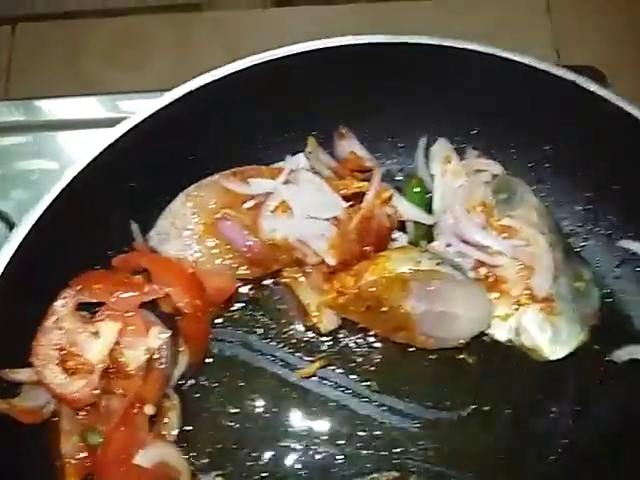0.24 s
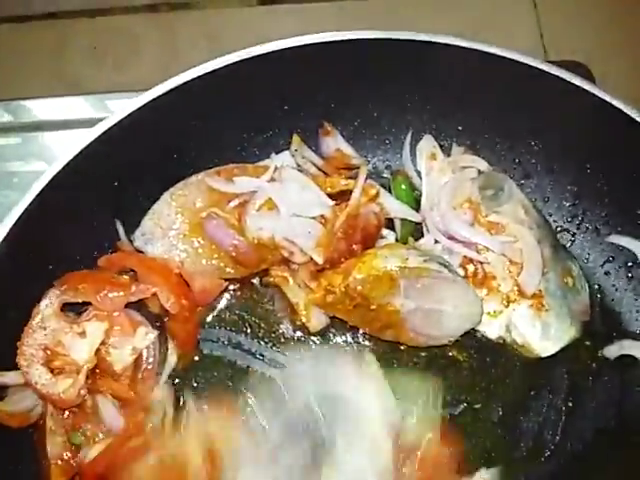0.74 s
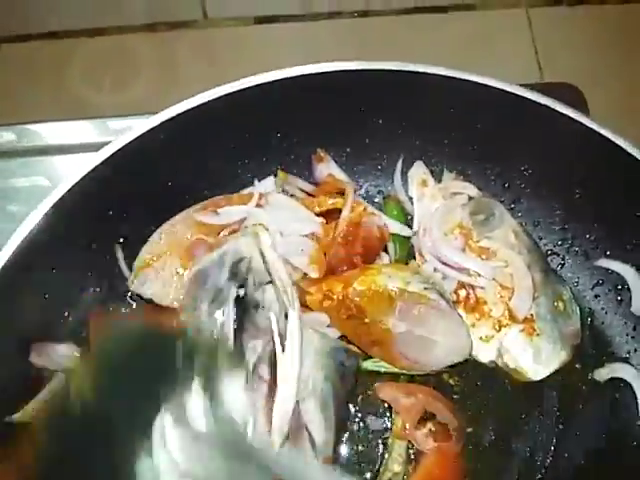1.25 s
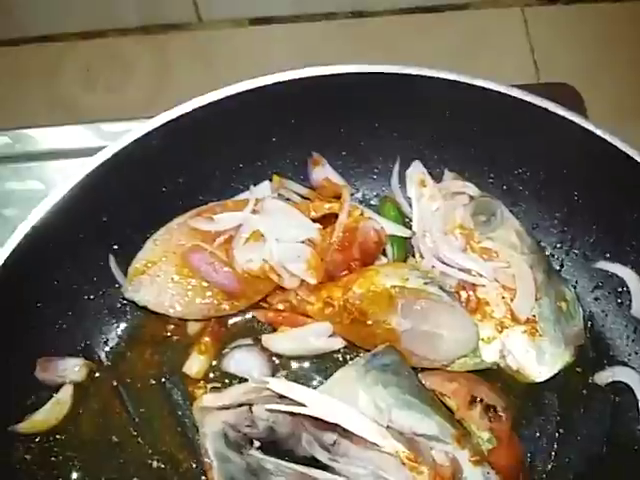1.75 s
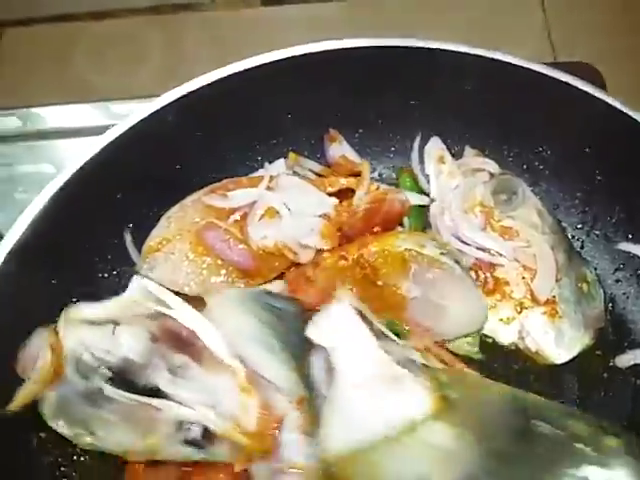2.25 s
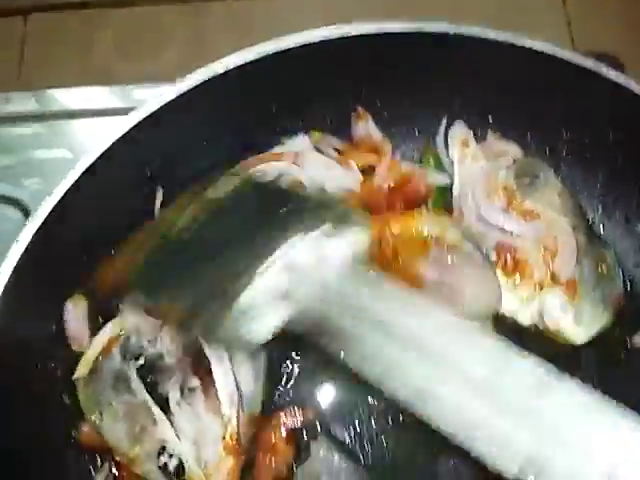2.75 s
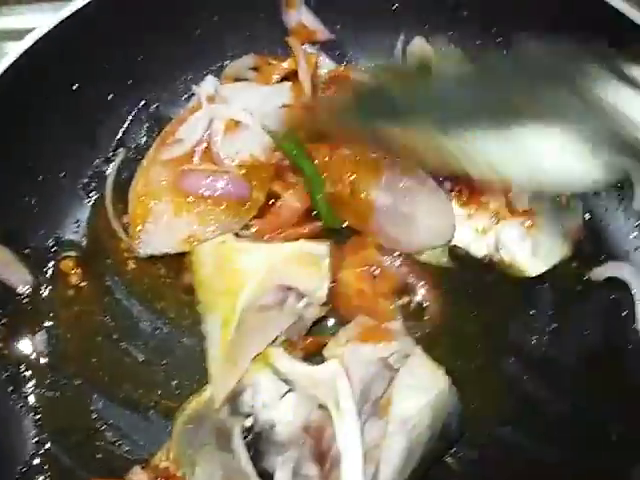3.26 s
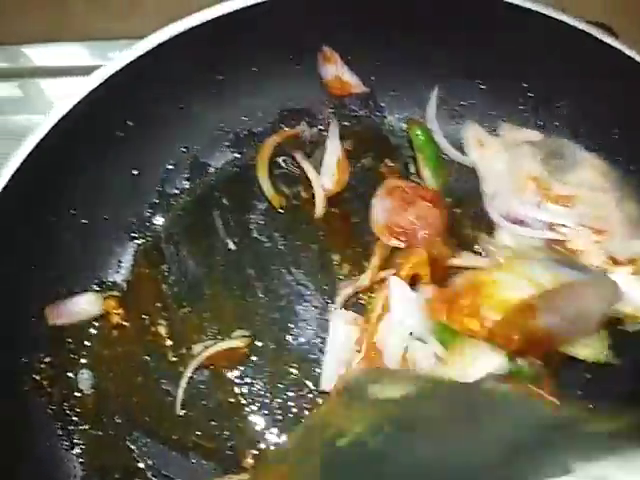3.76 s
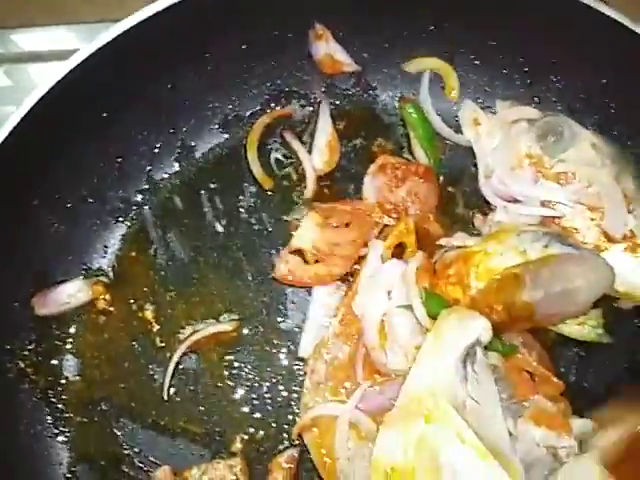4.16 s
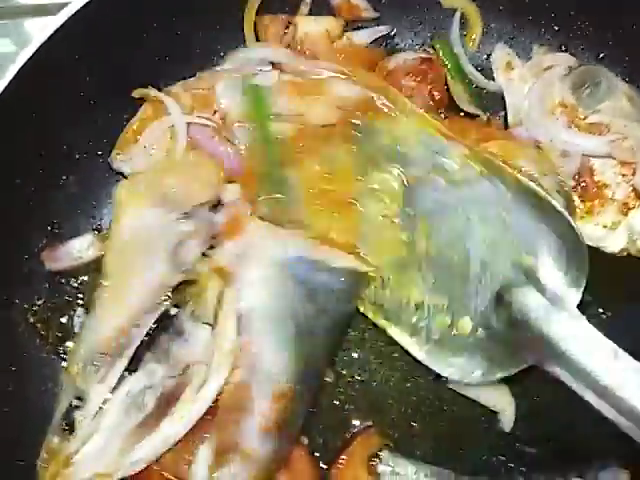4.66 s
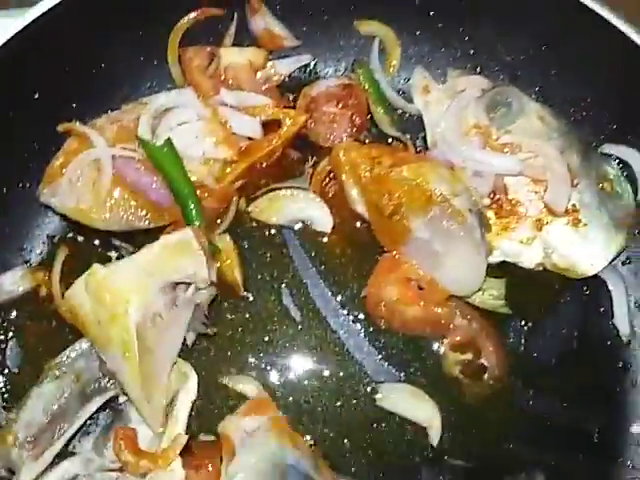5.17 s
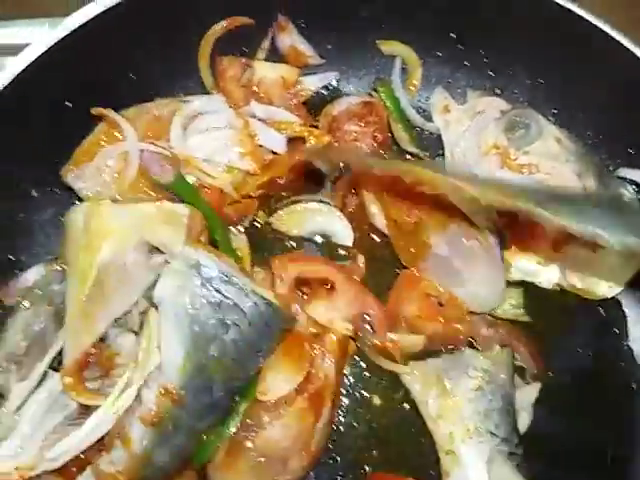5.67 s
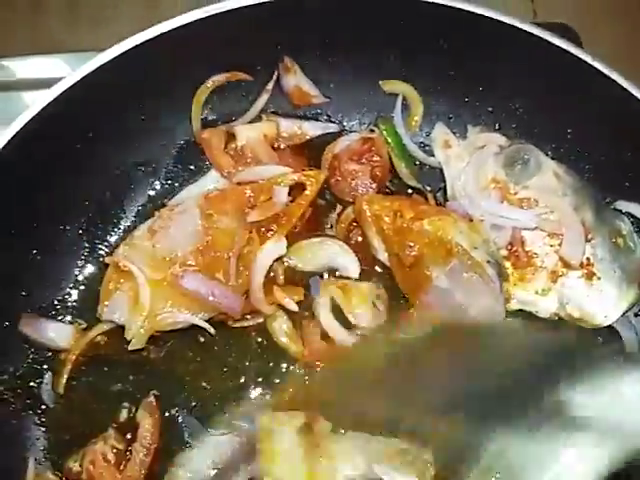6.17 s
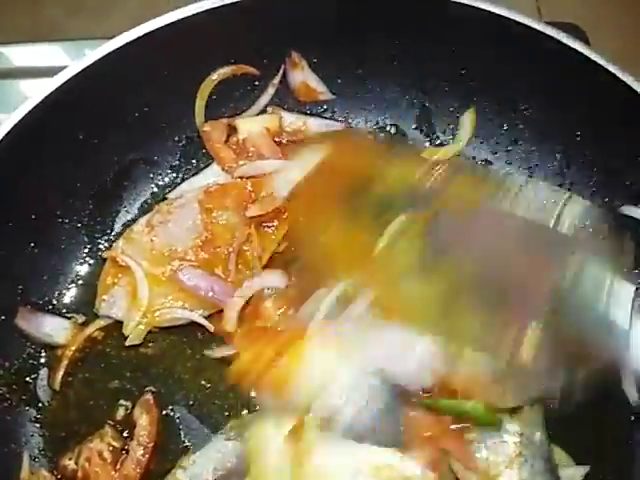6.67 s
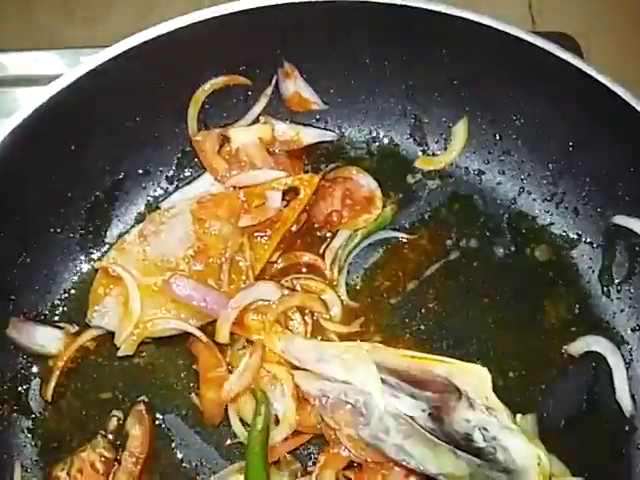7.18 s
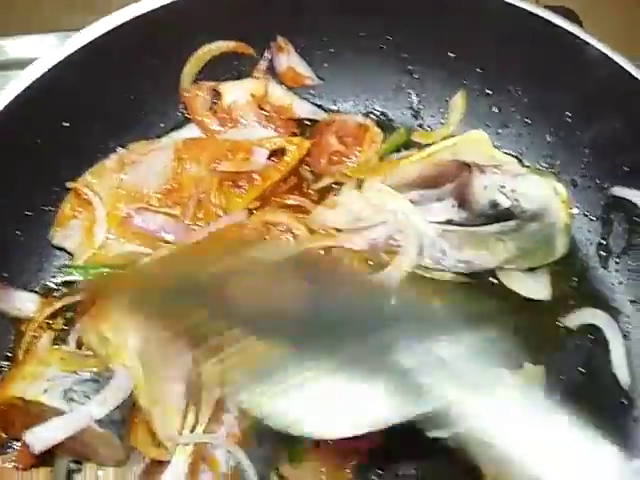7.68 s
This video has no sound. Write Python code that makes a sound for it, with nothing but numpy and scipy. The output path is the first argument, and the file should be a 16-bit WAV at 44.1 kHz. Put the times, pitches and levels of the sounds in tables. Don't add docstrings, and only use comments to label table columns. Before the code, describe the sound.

A steel turner works raw fish in a coated pan, close to a small microphone. Every second or so it strikes the pan with a hard clank, then drags in a short gritty scrape that makes the bowl and blade ring briefly. Between strokes come faint rubbing through food and tiny wet ticks. Hard kitchen walls add a short echo over a low, gently wavering hum.

```python
import sys
import numpy as np
from scipy import signal
from scipy.fft import rfft, irfft, next_fast_len
from scipy.io import wavfile

SR = 44100
rng = np.random.default_rng(int(sys.argv[2]) if len(sys.argv) > 2 else 0)


def ratio_of_db(decibels):
    return 10 ** (np.asarray(decibels, float) / 20)


def master_out(mix):
    frames = np.transpose(np.atleast_2d(mix))
    ceiling = np.clip(frames, -1, 1)
    pcm = np.round(ceiling * 32767).astype(np.int16)
    wavfile.write(sys.argv[1], SR, pcm)


N = 349272

# f/Hz, level/dB [per Hz]
ROOM_SPECTRUM = [(15, -56), (25, -24.5), (92, 2.5), (157, -11), (217, -9.5), (242, -20), (326, -6),
                 (394, -16), (451, -3.5), (591, -14), (1330, -20), (2280, -32), (2840, -7), (3340, -40.5),
                 (16000, -48.5)]
# f/Hz, width/Hz, level/dB
HUMS = [(100.6, 7.6, -59), (148.2, 21, -60), (337.5, 25, -63.5), (459.7, 34, -66), (6100, 1070, -93)]
# t/s, level/dB
RUMBLE_SWELL = [(0.0, -58), (0.84, -51), (1.1, -58.5), (1.68, -54), (1.94, -53), (3.09, -57.5), (3.7, -49),
                (3.97, -57), (4.24, -52), (6.0, -58), (6.6, -52), (6.97, -60), (7.92, -52.5)]
# start t/s, end t/s, f/Hz, level/dB
WHISTLES = [
    (2.45, 3.0, 2810, -78),
    (4.8, 5.05, 3000, -72),
    (4.75, 5.4, 3340, -72),
]
# t/s, peak level/dB, pitch
# f/Hz
WET_TICKS = [(0.0557, -43, 6600), (0.099, -49, 4160), (0.1336, -41, 5800), (0.928, -39, 5830),
             (1.3488, -57, 6700), (1.794, -57, 6770), (2.3391, -47, 5090), (2.4394, -43, 4200),
             (2.489, -52, 7500), (2.545, -50, 9000), (2.472, -42, 6050), (2.5441, -50, 2180),
             (2.974, -41, 5250), (2.916, -55, 3500), (3.167, -55, 5800), (3.172, -54, 7500),
             (3.186, -49, 2500), (3.197, -54, 6300), (3.279, -60, 4000), (3.6294, -42, 10000),
             (3.7805, -39, 3000), (3.9107, -58, 11000), (7.3665, -27, 3300), (7.519, -46, 8000),
             (3.9898, -56, 6430), (4.253, -25, 3860), (4.585, -33, 4790), (4.73, -43.5, 6170),
             (4.9364, -57, 6960), (5.007, -47, 5000), (5.0191, -48, 5000), (5.066, -61, 4500),
             (5.0774, -45, 3390), (5.0937, -42, 2780), (5.1123, -55.5, 2800), (5.149, -67, 6500),
             (5.2465, -62.5, 4040), (4.302, -30, 5500), (1.311, -60, 4800), (1.369, -52, 3400),
             (1.4211, -57, 4960), (1.6505, -55, 6500), (1.6705, -53, 2840), (6.845, -48, 3800),
             (4.3229, -30, 2610), (5.889, -62, 6550), (6.152, -56, 10500), (6.1749, -36, 6600),
             (6.2277, -40, 5900), (6.799, -43, 6940), (6.8317, -42, 6900), (6.891, -41.5, 6270),
             (7.588, -42, 7800), (7.7097, -43, 6700), (7.8456, -51.5, 7000)]
# start t/s, length t/s, peak level/dB [rms], f/Hz
HELD_MODES = [(.72, 0.15, -40.5, 148.4), (0.718, 0.094, -40, 634), (0.788, 0.076, -38, 431.6),
              (0.794, 0.079, -40, 2265), (0.799, 0.079, -40.5, 3980), (0.788, 0.078, -47, 6000),
              (0.794, 0.085, -43.5, 6890), (0.805, .09, -53, 9580), (0.796, 0.074, -53, 10500),
              (1.427, 0.073, -58, 3930), (1.435, 0.12, -57, 2415), (1.459, 0.11, -55, 2840),
              (1.439, 0.053, -57, 1590), (1.516, 0.064, -53, 1620), (2.082, 0.086, -47, 4400),
              (2.151, 0.057, -40.5, 2820), (3.533, 0.13, -34, 512), (3.534, 0.081, -49, 1554),
              (3.55, 0.082, -61, 5190), (3.7, 0.029, -38.5, 3110), (3.701, .05, -43, 2156),
              (3.531, 0.12, -38.5, 268), (3.771, .05, -45, 2170), (4.169, 0.15, -35.5, 424),
              (4.171, 0.1, -41, 302.5), (4.2, 0.13, -42.5, 2582), (4.199, .11, -40.5, 3880),
              (4.235, 0.078, -45, 6060), (4.24, 0.076, -44, 6980), (4.359, 0.056, -37, 1648),
              (4.36, 0.082, -41, 2683), (4.373, 0.085, -46, 3750), (4.502, 0.031, -54, 3770),
              (4.55, 0.1, -55, 2110), (0.718, 0.1, -41.5, 247), (5.422, 0.18, -50, 1640),
              (5.523, 0.054, -42, 2450), (5.531, 0.045, -33, 618), (6.17, .06, -58, 3710),
              (6.285, 0.05, -57, 1100), (6.483, 0.12, -32.5, 441), (6.513, 0.2, -41.5, 2950),
              (6.538, 0.17, -42.5, 3905), (6.603, 0.073, -64, 6800), (6.595, 0.084, -52, 7900),
              (7.372, 0.11, -34, 402), (7.432, 0.064, -36.5, 589), (7.455, 0.025, -32, 1071),
              (7.481, 0.037, -44, 1655), (7.42, 0.03, -18.5, 1070)]
# t/s,
# peak level/dB, f/Hz, T60 t/s
CAUGHT_MODES = [(.723, -28, 342, 0.16), (1.907, -27.5, 296, 0.22), (1.907, -34, 700, 0.3),
                (2.075, -19.5, 419, 0.26), (4.146, -15, 293.6, 0.16), (4.329, -21.5, 342, 0.08),
                (6.475, -17.5, 445, 0.076), (6.489, -13.5, 422, 0.098), (.723, -23, 292, 0.11),
                (7.368, -24.5, 420, 0.35), (.233, -46, 1160, 0.047), (.724, -24.5, 1041, 0.12),
                (.8485, -26, 1074, 0.14), (.855, -23.5, 1267, 0.15), (1.9076, -24.5, 1020, 0.17),
                (2.124, -17, 1136, 0.081), (2.15, -18, 1157, 0.19), (2.192, -14, 1122, 0.17),
                (2.235, -29, 1120, 0.33), (3.064, -37, 1123, 0.29), (4.144, -20, 1010, 0.12),
                (4.364, -21, 1095, 0.12), (4.395, -26, 1155, 0.24), (4.412, -21, 1126, 0.15),
                (4.45, -38, 1116, 0.3), (5.59, -23.5, 1054, 0.15), (6.651, -24, 1080, 0.12),
                (7.404, -22.5, 1058, 0.31), (7.484, -40, 1071, 0.43),
                (0.84, -17.5, 1660, 0.076), (1.55, -47, 1500, 0.23), (1.906, -27.5, 1545, 0.14),
               (1.906, -29.5, 1906, .085), (2.3763, -39, 1675, 0.062), (4.353, -30, 1800, 0.18),
               (5.54, -23, 1660, 0.18), (5.57, -30, 1745, 0.13), (6.55, -32.5, 1650, 0.21),
               (6.665, -25, 1604, 0.1), (6.62, -35, 2290, 0.14), (6.64, -33, 2050, 0.12),
               (7.366, -17, 1750, 0.095), (7.434, -16, 1670, 0.13), (7.475, -32, 1653, 0.3),
               (.8275, -31, 2280, 0.27), (1.906, -34, 2562, 0.085), (3.78, -27, 2110, 0.054),
               (1.906, -38, 3200, .07), (5.421, -40, 3320, 0.054), (5.421, -46, 2600, 0.052),
               (4.145, -29.5, 2800, .12), (3.85, -43, 2350, 0.098), (4.35, -24.5, 3060, .065),
               (4.6, -57, 2200, 0.24), (6.476, -16.5, 2296, 0.056), (0.83, -22.5, 3990, 0.036),
               (3.0636, -32, 3940, 0.05), (6.601, -35, 3880, 0.1), (3.699, -25, 7060, 0.045),
               (3.71, -23.5, 7000, 0.06), (1.3492, -65, 8600, .06), (1.349, -69, 7900, .08),
               (1.349, -65, 6600, .07), (4.352, -30, 6450, 0.06)]
# t/s, peak level/dB, pitch f/Hz
HARD_CONTACTS = [(0.7236, -12, 785), (1.9057, -25, 1020), (2.0745, -23, 700), (2.15, -14, 1160),
                 (2.3755, -32, 1500), (3.067, -28.5, 1120), (3.538, -24, 820), (3.622, -27.5, 700),
                 (4.144, -19, 1000), (4.327, -22, 800), (4.3538, -9.5, 1600), (5.421, -25.5, 890),
                 (5.5885, -13, 1600), (6.475, -15.5, 1320), (6.4902, -15.5, 500), (7.3664, -14.5, 1520)]
# t/s, level/dB, place [0 pan floor - 1 pan wall], hardness level/dB
KNOCKS = [(.723, -18, 0.52, 0), (1.904, -33, 0.78, 10), (1.981, -44.5, 0.98, 7), (2.074, -24.5, 0.62, 3),
          (2.152, -32.5, 0.28, 4), (2.19, -45, 0.82, -6), (2.375, -31, 0.61, -31), (3.022, -39.5, 0.66, -2),
          (3.067, -36.5, 0.48, 8), (3.537, -38.5, 0.2, -3), (3.705, -36.5, 0.5, 10.5),
          (3.775, -44.5, 0.65, 13), (4.144, -26.5, 0.28, 7.5), (4.329, -30, 0.36, -9),
          (4.353, -20, 0.49, 6.5), (5.421, -31, 0.25, -8), (5.588, -30, 0.86, 3.5), (6.474, -23.5, 0.6, 1),
          (6.488, -24.5, 0.53, -20.5), (7.366, -15.5, 0.65, -19)]
# start t/s, swell t/s, fade t/s, peak level/dB
LEANS = [(.724, 0.0052, 0.07, -30), (.77, 0.05, 0.07, -29.5), (1.906, 0.0062, 0.01, -26.5),
         (1.95, 0.12, 0.071, -35.5), (2.072, 0.0013, 0.049, -21.5), (2.12, 0.078, 0.026, -31),
         (3.537, 0.0063, 0.091, -35.5), (3.55, 0.064, 0.068, -34), (4.145, 0.0037, 0.021, -14.5),
         (4.15, 0.061, 0.15, -29.5), (4.29, 0.02, 0.02, -26), (4.322, .008, .012, -20),
         (4.353, .004, 0.044, -27.5), (5.421, 0.0011, 0.026, -27.5), (5.44, 0.098, 0.083, -26.5),
         (6.474, 0.0032, 0.017, -15), (6.49, 0.075, 0.14, -33.5), (7.365, 0.011, 0.034, -26.5),
         (7.38, 0.054, 0.016, -24.5)]
# start t/s, swell t/s, fade t/s, peak level/dB, brightness level/dB [blade over wall]
SCRAPES = [(.724, 0.0011, 0.039, -39.5, 4.5), (0.753, 0.11, 0.023, -24.5, -6.5),
           (0.8, 0.021, 0.078, -32, -1.5), (1.905, 0.0033, 0.072, -34, -5),
           (1.954, 0.047, 0.26, -36.5, -10.5), (2.074, 0.0063, 0.067, -22, -7),
           (2.08, 0.1, 0.056, -20.5, -12.5), (3.04, 0.028, 0.027, -33.5, -6.5),
           (3.538, 0.0043, 0.021, -39, -8), (3.542, 0.074, 0.14, -40, -5.5),
           (3.694, 0.013, 0.044, -26, -4.5), (3.72, 0.055, 0.077, -40.5, -6),
           (4.142, 0.0031, 0.054, -30, -2.5), (4.191, 0.068, 0.069, -32.5, 0.5),
           (4.321, 0.0021, 0.025, -29, -1.5), (4.35, 0.0033, 0.11, -28, 0.5),
           (4.369, 0.061, 0.017, -21.5, -10.5), (5.419, 0.0019, 0.023, -32, -14),
           (5.454, 0.11, 0.06, -27, -12.5), (6.474, 0.0014, 0.14, -28.5, -6),
           (6.538, 0.11, 0.045, -25.5, -5.5), (7.367, 0.0049, 0.056, -21.5, -19),
           (7.379, 0.061, 0.024, -16.5, -17.5), (7.439, 0.027, .016, -21.5, -15)]
# start t/s, swell t/s, fade t/s, peak level/dB, brightness level/dB
DRAGS = [(0.0, 0.00033, 0.18, -47, -2.5), (.222, 0.015, 0.044, -59, -2), (.885, .003, 0.17, -46.5, -3),
         (1.3, 0.015, 0.28, -61, -12), (1.41, 0.12, 0.14, -48, -2), (2.225, .003, 0.45, -49, -9.5),
         (2.3, 0.038, 0.26, -53.5, -1), (2.47, 0.067, 0.035, -57.5, 3.5), (2.88, .15, .05, -51.5, -2),
         (3.09, 0.0058, 0.17, -52.5, -1.5), (3.775, 0.071, 0.097, -46, -6), (3.975, 0.019, .03, -56, -9.5),
         (4.45, 0.078, 0.11, -46.5, -4.5), (4.52, 0.052, 0.3, -48, -3), (4.93, 0.088, 0.2, -55, -6),
         (5.63, 0.0096, 0.09, -47.5, -7.5), (6.0, 0.059, .08, -55, -13.5), (6.09, .14, 0.1, -44, -6),
         (6.69, 0.0033, 0.22, -49, -2.5), (6.74, 0.048, 0.2, -52.5, -1), (6.88, 0.095, 0.044, -67, 4.5),
         (7.49, 0.0028, 0.19, -47, -5), (7.69, 0.01, 0.094, -53, -8.5), (7.82, 0.033, 0.043, -56.5, -15)]
# start t/s, swell t/s, fade t/s, peak level/dB
SKATES = [
    (3.537, 0.087, 0.037, -54),
    (5.51, .04, .018, -49),
    (5.587, .002, .012, -51),
    (6.17, 0.0043, 0.01, -57),
    (6.475, .13, .07, -50),
    (6.85, 0.084, .08, -65),
    (7.37, .07, 0.049, -52),
]
# f/Hz, width/Hz, level/dB [blade on the floor], level/dB [on the wall]
BOWL_MODES = [(267.8, 11, -11, -16), (296, 20.7, -3, 1), (320, 15.3, 4, -3), (437.2, 17, 1, -11),
              (536.7, 16, -11.5, -3), (601.4, 33, -3.5, 3), (731, 9.8, -21.5, -11)]
# f/Hz, width/Hz, level/dB [blade on the floor], level/dB [on the wall]
WALL_MODES = [(1020, 165, -1.5, -7), (1100, 38, 0.5, -7.5), (1230, 91, -12, -9.5), (1602, 75, -2, -8),
              (1690, 18, -5.5, -10.5), (1860, 255, -4.5, -4.5), (2133, 57, -11, -6),
              (2260, 83, -11.5, -5.5), (2683, 330, -18, -4.5)]
# f/Hz, width/Hz, level/dB [blade on the floor], level/dB [on the wall]
BLADE_MODES = [(2915, 610, -2, -2.5), (3480, 83, -12.5, -3), (3745, 420, -10, -4), (4415, 260, -5.5, -3),
               (4960, 300, -6, -5.5), (5440, 280, -4.5, -9.5), (6020, 190, 0, -5.5), (6455, 70, -9, -5.5),
               (6795, 97, -9.5, -5), (7700, 40, -22, -28)]
# f/Hz, width/Hz, level/dB [blade on the floor], level/dB [on the wall]
EDGE_MODES = [(9230, 76, -6.5, -1.5), (10500, 120, -33, -28), (12650, 120, -13.5, -3.5),
              (13500, 190, -27, -19)]
PART_EDGES_HZ = [140, 800, 2800, 8000, 15000]
# its resonances, level/dB of the dense unresolved modes between them
PARTS = [(BOWL_MODES, -4), (WALL_MODES, -19), (BLADE_MODES, -5.5), (EDGE_MODES, 0.5)]

ROOM_TONE_DB = -51
KITCHEN_T60_S, KITCHEN_DB, WALL_CUT_HZ = 0.52, -15, 2600
HELD_WIDTH_HZ, HELD_WIDTH_SHARE = 16, .024
HELD_FLUTTER_DB = 2.5
CRACK_CYCLES = 0.42
PRESS_SWELL_DB, PRESS_FADE_DB = 16, 17.5
DRAG_SWELL_DB, DRAG_FADE_DB = 14, 18.5
EDGE_DB, EDGE_FOLLOWS = -8.5, 1.66
DULLS = 0.086
PLACE_MID, PLACE_SPAN_DB = 0.31, 37
KNOCK_SPAN_DB = 29.5
BLADE_TOP_HZ, EDGE_TOP_HZ = 7900, 12500


def rms_one(x):
    return x / np.sqrt(np.mean(x ** 2) + 1e-20)


def band(x, low_hz, high_hz):
    sos = signal.butter(2, [low_hz, min(high_hz, .45 * SR)], "band", fs=SR, output="sos")
    return signal.sosfilt(sos, x)


def low_pass(x, order, top_hz):
    return signal.sosfilt(signal.butter(order, top_hz, fs=SR, output="sos"), x)


def resonate(x, hz, width_hz):
    r = np.exp(-np.pi * width_hz / SR)
    gain = np.sqrt((1 - r * r) / 2)
    return signal.lfilter(gain * np.array([1, 0, -1]), [1, -2 * r * np.cos(2 * np.pi * hz / SR), r * r], x + 1e-18)


def drift(rate_hz):
    r = np.exp(-80 * np.pi * rate_hz / SR)
    noise = rng.standard_normal(N // 40 + 1002)
    slow = signal.lfilter([1], [1, -2 * r, r * r], noise)[1000:]
    return np.interp(np.arange(N) / 40, np.arange(len(slow)), rms_one(slow))


def room_tone():
    t = np.arange(N) / SR
    swell_s, swell_db = np.transpose(RUMBLE_SWELL)
    swell = ratio_of_db(np.interp(t, swell_s, swell_db, left=swell_db[-1], right=swell_db[-1]) - np.mean(swell_db))
    edges_hz = 22 * 2 ** np.arange(0, 9.6, .5)
    white = rng.standard_normal((2, N))
    hz, db = np.transpose(ROOM_SPECTRUM)
    air = 0
    for k, (low, high) in enumerate(zip(edges_hz, edges_hz[1:])):
        gain = ratio_of_db(np.interp(np.log(low * high) / 2, np.log(hz), db) + 1.2 * drift(2.5))
        air = air + gain * band(white[k % 2], low, high) * (swell if high < 260 else 1)
    out = ratio_of_db(ROOM_TONE_DB - 3.5) * rms_one(air)
    for hz, width_hz, db in HUMS:
        hum = resonate(resonate(rng.standard_normal(N), hz, width_hz), hz, width_hz)
        out += ratio_of_db(db) * swell * rms_one(hum)
    for start_s, end_s, hz, db in WHISTLES:
        fade = np.sin(np.pi * np.clip((t - start_s) / (end_s - start_s), 0, 1)) ** .4
        tone = np.sin(2 * np.pi * hz * t + 0.96 * drift(6.5))
        out += ratio_of_db(db) * fade * ratio_of_db(2 * drift(3.6)) * tone
    return out


def kitchen(x):
    size = next_fast_len(N + SR)
    hz = np.arange(size // 2 + 1) * SR / size
    echo = 0
    for k, lag_s in enumerate(rng.uniform(.012, .04, 12)):
        loss = ratio_of_db(-60 * lag_s / KITCHEN_T60_S * (1.5 + hz / WALL_CUT_HZ))
        loop = loss * np.exp(-2j * np.pi * hz * lag_s)
        echo = echo + (-1) ** k * loop / (1 - loop)
    return irfft(rfft(x, size) * echo, size)[:N]


def wet_ticks():
    out, t = np.zeros(N), np.arange(400) / SR
    for (s, db, hz), noise in zip(WET_TICKS, rng.standard_normal((len(WET_TICKS), 400))):
        snap = noise * np.exp(-t / 0.0019)
        burst = resonate(resonate(snap, hz, 0.38 * hz), hz, 0.46 * hz)
        at = round(s * SR)
        out[at:at + 400] += ratio_of_db(db) * burst / np.abs(burst).max()
    return out


def held_modes():
    out, flutter = np.zeros(N + SR), ratio_of_db(HELD_FLUTTER_DB * drift(45))
    for (s, length_s, db, hz), steps in zip(HELD_MODES, rng.standard_normal((len(HELD_MODES), SR // 2))):
        t = np.arange(round(length_s * SR)) / SR
        width_hz = HELD_WIDTH_HZ + HELD_WIDTH_SHARE * hz
        stagger = np.cumsum(steps[:len(t)]) * np.sqrt(2 * np.pi * width_hz / SR)
        tone = band(np.sin(2 * np.pi * hz * t + stagger), hz / 1.15, hz * 1.15)
        shape = np.sin(np.pi * t / length_s) ** 0.77
        at = round(s * SR)
        out[at:at + len(t)] += ratio_of_db(db + 3) * shape * tone
    return out[:N] * flutter


def singing_modes():
    out, t = np.zeros(N + SR // 2), np.arange(SR // 2) / SR
    sings = CAUGHT_MODES
    for (s, db, hz, t60_s), phase in zip(sings, rng.uniform(0, 2 * np.pi, (len(sings), 2))):
        later_s = [row[0] - s for row in sings if row[0] > s and abs(row[2] / hz - 1) < .07]
        stop_s = min(later_s + [1])
        decays = t / max(t60_s, .02)
        ring = ratio_of_db(db - 60 * decays) + ratio_of_db(db - 36.0 - 25 * decays)
        pumped = (1 - np.exp(-t / 0.0022)) * ring
        pair = np.sin(2 * np.pi * hz * t + phase[0]) + 0.31 * np.sin(2 * np.pi * 1.022 * hz * t + phase[1])
        at = round(s * SR)
        out[at:at + len(t)] += pumped * pair * np.exp(-np.maximum(t - stop_s, 0) / .003)
    return out[:N] * ratio_of_db(1.42 * drift(39))


def cracks():
    out, t = np.zeros(N), np.arange(500) / SR
    for s, db, hz in HARD_CONTACTS:
        pulse = -t * np.exp(-t * hz / CRACK_CYCLES) * np.sin(2 * np.pi * hz * t)
        at = round(s * SR)
        out[at:at + 500] += ratio_of_db(db) * pulse / np.abs(pulse).max()
    return out


def knock_levels_db():
    s, db, place, hard_db = np.transpose(KNOCKS)
    tilt_db = KNOCK_SPAN_DB * (place - .5)
    return [db - tilt_db, db + tilt_db, db + hard_db, db + EDGE_FOLLOWS * hard_db]


def knock_force(levels_db, modes):
    force = np.zeros((modes, N))
    chance = rng.standard_normal((len(KNOCKS), modes + 3))
    for row, db, luck in zip(KNOCKS, levels_db, chance):
        for bounce, loss_db in enumerate([0, -5, -9]):
            delay_s = .0008 + bounce * .0022 * (1 + .25 * luck[bounce])
            at = round((row[0] + delay_s) * SR)
            force[:, at] += ratio_of_db(db + loss_db + 2.04 * luck[3:]) * (-1) ** bounce
    return force


def friction(slips_per_s, spread_db, judder_db):
    sizes = ratio_of_db(spread_db * np.minimum(rng.exponential(1, N), 5)) * rng.choice([-1, 1], N)
    slips = rng.random(N) < slips_per_s / SR
    return rms_one(sizes * slips * ratio_of_db(judder_db * drift(45)))


def pressure(events, swell_db, fade_db, fall_db_per_s):
    t = np.arange(N) / SR
    rows = 3 if len(events[0]) == 5 else 1
    levels_db = np.full((rows, N), -150.)
    for s, swell_s, fade_s, db, *bright_db in events:
        peaks_db = [db]
        for bright in bright_db:
            peaks_db += [db + bright, db + EDGE_DB + EDGE_FOLLOWS * bright]
        times = s + np.cumsum([0, swell_s + 0.00063, fade_s + 0.00063])
        span = slice(round(s * SR), round(times[-1] * SR))
        shape_db = -np.interp(t[span], times, [-np.sqrt(swell_db), 0, np.sqrt(fade_db)]) ** 2
        stroke_db = shape_db * (1 + DULLS * np.c_[:rows]) + np.c_[peaks_db]
        levels_db[:, span] = np.maximum(levels_db[:, span], stroke_db)
    return np.maximum.accumulate(levels_db + fall_db_per_s * t, axis=1) - fall_db_per_s * t


def sheet(force, ring_s):
    t = np.arange(SR // 10) / SR
    answers = rng.standard_normal((2, len(t))) * np.exp(-t / ring_s)
    turn = 2.0 * drift(5.4)
    out = 0
    for share, answer in zip([np.cos(turn), np.sin(turn)], answers):
        out = out + signal.oaconvolve(force * share, answer / np.linalg.norm(answer))[:N]
    return out


def turner_on_pan():
    lean_db = pressure(LEANS, PRESS_SWELL_DB, PRESS_FADE_DB, fall_db_per_s=898.0)
    scrape_db = pressure(SCRAPES, PRESS_SWELL_DB, PRESS_FADE_DB, fall_db_per_s=898.0)
    place = np.clip(PLACE_MID + (scrape_db[0] - lean_db[0]) / PLACE_SPAN_DB, 0, 1)
    pressed = ratio_of_db(np.vstack([lean_db, scrape_db]) - 6.0)
    pressed[3] += ratio_of_db(pressure(SKATES, PRESS_SWELL_DB, PRESS_FADE_DB, fall_db_per_s=900)[0])
    wall, blade, _ = ratio_of_db(pressure(DRAGS, DRAG_SWELL_DB, DRAG_FADE_DB, fall_db_per_s=234) - 5.5)
    light = [ratio_of_db(-8.0) * wall, wall, blade, ratio_of_db(-15) * blade]
    rub = friction(3000, spread_db=2.5, judder_db=1.3)
    grit = friction(2500, spread_db=3.5, judder_db=2.0)
    knock_gains_db = [17.0, 15, 8.5, -22.0]
    levels_db = knock_levels_db()
    out = 0
    for k, (modes, dense_db) in enumerate(PARTS):
        low_hz, high_hz = PART_EDGES_HZ[k:k + 2]
        blows = ratio_of_db(knock_gains_db[k]) * knock_force(levels_db[k], len(modes) + 1)
        contact = pressed[k] + light[k]
        dense_gain = ratio_of_db(dense_db) * np.sqrt(SR / 2 / (high_hz - low_hz))
        part = dense_gain * band(sheet(grit * contact, ring_s=0.0015) + blows[-1], low_hz, high_hz)
        for j, (hz, width_hz, floor_db, wall_db) in enumerate(modes):
            wander_db = 3.2 * drift(9)
            strength = ratio_of_db(floor_db + place * (wall_db - floor_db) + wander_db - 4.5)
            part = part + (-1) ** j * resonate((rub * contact + blows[j]) * strength, hz, width_hz)
        if k == 2:
            part = low_pass(part, 4, BLADE_TOP_HZ)
        if k == 3:
            part = low_pass(part, 2, EDGE_TOP_HZ)
        out = out + band(part, low_hz / 3, high_hz * 1.6)
    return out


def scene():
    pan = turner_on_pan() + cracks() + wet_ticks() + held_modes()
    return (pan + singing_modes() + ratio_of_db(KITCHEN_DB) * kitchen(pan) + room_tone())[None]


def top_cut(x):
    return signal.sosfilt(signal.butter(12, 16590, fs=SR, output="sos"), x)


def record(dry):
    thin = signal.sosfilt(signal.butter(4, 50, "highpass", fs=SR, output="sos"), dry)
    rounded = .5 * np.tanh(thin / .5)
    cut = signal.sosfilt(signal.cheby2(16, 40, 16150, fs=SR, output="sos"), rounded)
    return top_cut(cut)


dry = scene()
out = record(dry)
master_out(out)
```